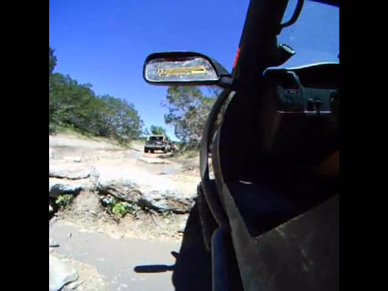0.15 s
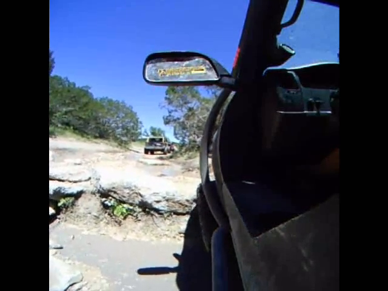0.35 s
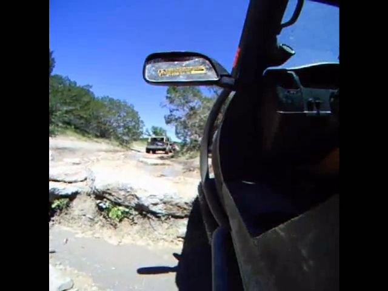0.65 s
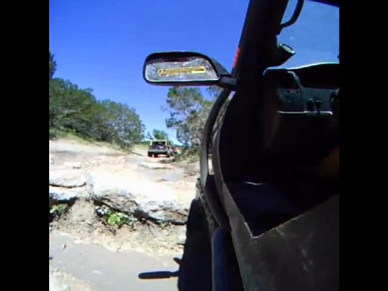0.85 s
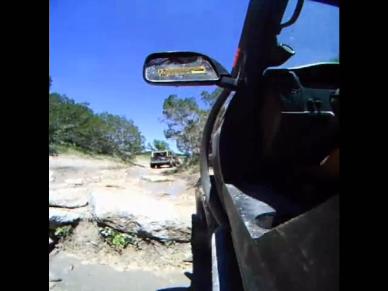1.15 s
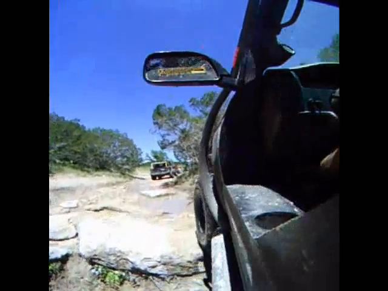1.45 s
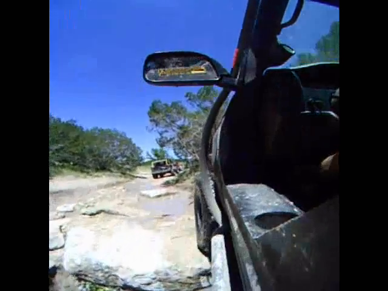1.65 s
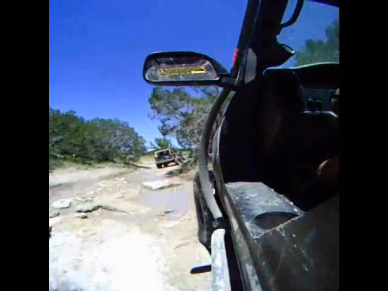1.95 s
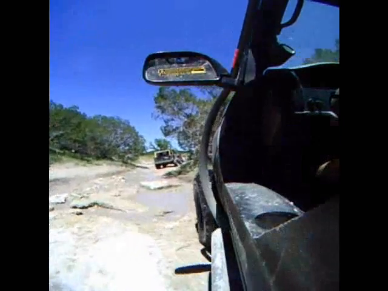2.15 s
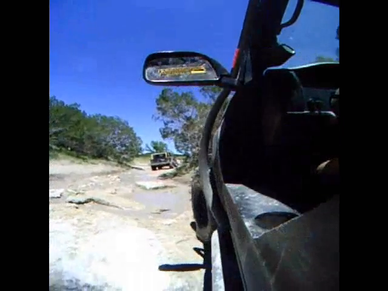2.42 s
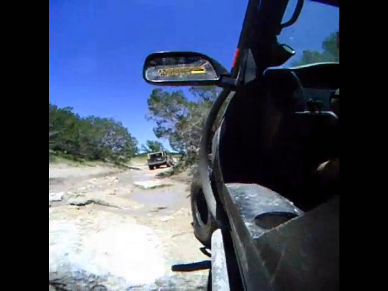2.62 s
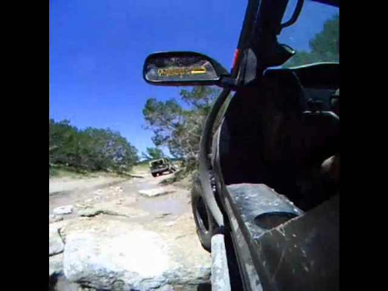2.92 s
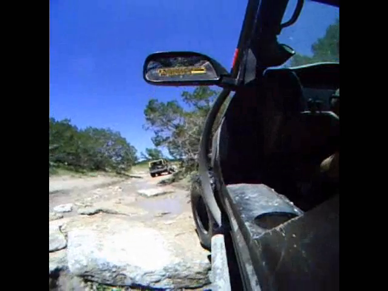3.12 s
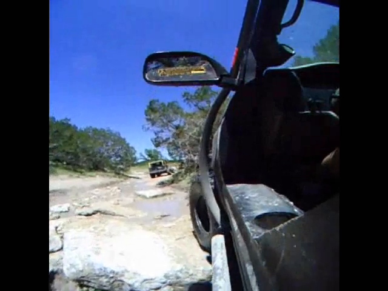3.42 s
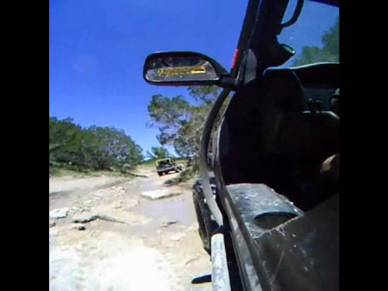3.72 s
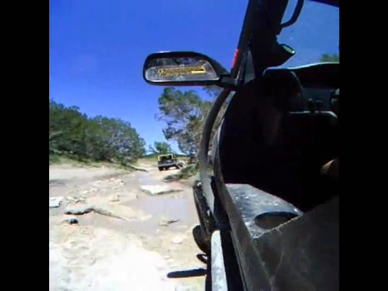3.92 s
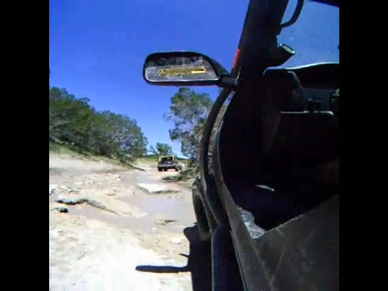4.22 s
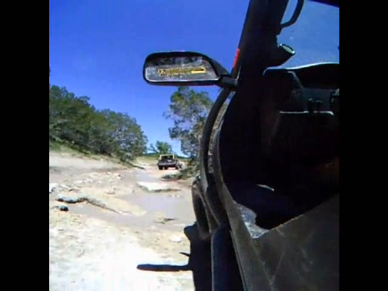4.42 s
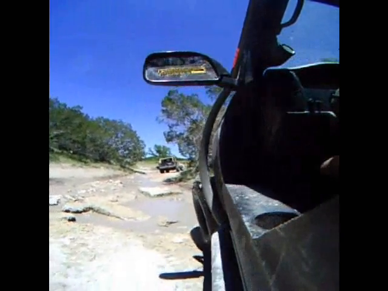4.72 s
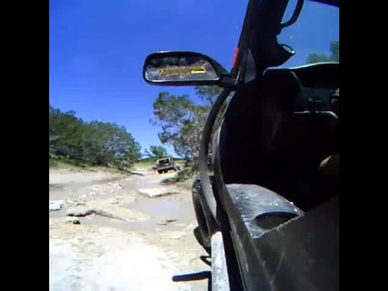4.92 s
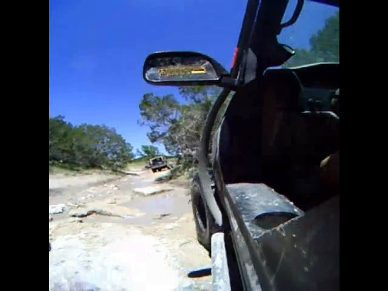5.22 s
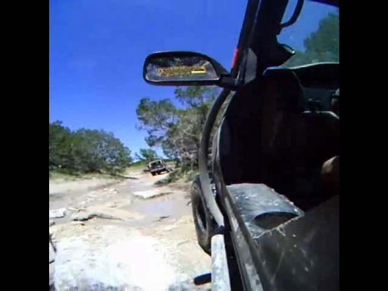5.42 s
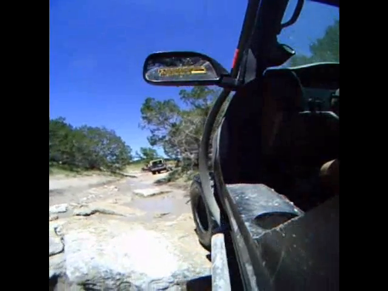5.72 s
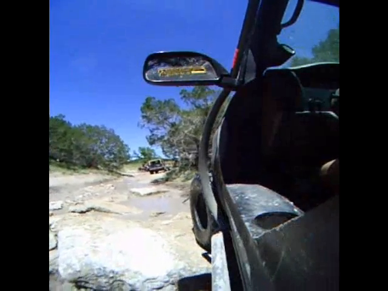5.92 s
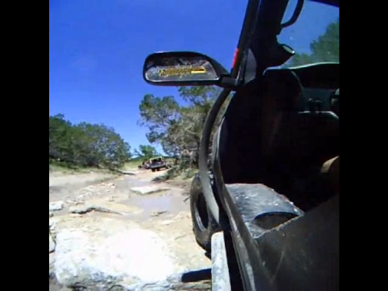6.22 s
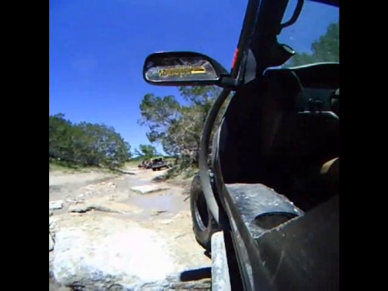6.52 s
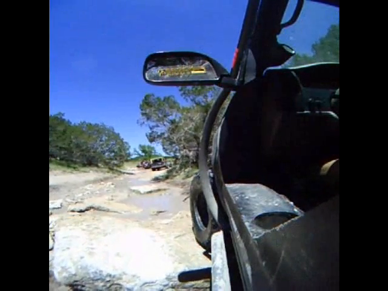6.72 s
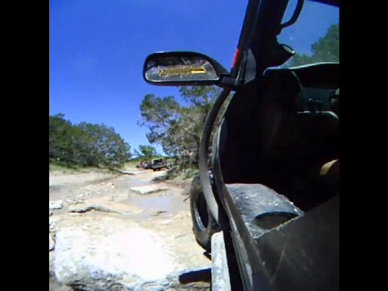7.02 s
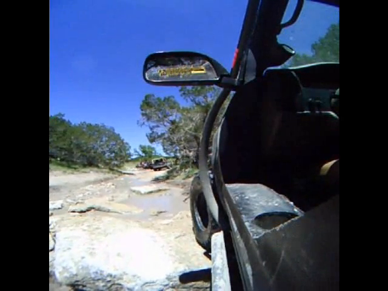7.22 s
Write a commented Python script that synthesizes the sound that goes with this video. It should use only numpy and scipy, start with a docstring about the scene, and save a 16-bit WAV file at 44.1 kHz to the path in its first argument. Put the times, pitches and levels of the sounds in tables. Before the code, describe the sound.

An off-road vehicle crawls over rock ledges, its engine swelling and cab booming low, with suspension knocks, metal clanks and rattles.

```python
"""Crawling over rock ledges

An off-road vehicle on rock, heard close up from a microphone on its door. The engine swells at each
step, the tyres thump and the shaken cab booms on one low note. The suspension knocks, the steel body
clanks and loose trim rattles. The small recorder adds hiss, and a fine crackle and thin whistle to the boom."""
import sys
import numpy as np
from scipy.fft import rfft, irfft, next_fast_len
from scipy.io import wavfile
from scipy.ndimage import map_coordinates

SR = 44100
rng = np.random.default_rng(int(sys.argv[2]) if len(sys.argv) > 2 else 0)


def generate_wav(signal):
    """Clip the signal to [-1, 1] and save it as 16-bit WAV at the path in sys.argv[1]."""
    frames = np.transpose(np.atleast_2d(signal))
    scaled = np.clip(frames, -1, 1) * 32767
    pcm = np.round(scaled).astype(np.int16)
    wavfile.write(sys.argv[1], SR, pcm)


N = 324344

# the driver feeds the throttle at each ledge: t/s, firing rate/Hz, engine bay level/dB
THROTTLE = [(0.0, 50.76, -65.5), (0.48, 59.79, -58), (1.2, 54.01, -61), (1.53, 51.01, -61),
            (1.85, 64.23, -55), (2.1, 52.7, -61.5), (2.45, 43.84, -71), (3.02, 66.54, -54.5),
            (3.33, 75.18, -48.5), (3.62, 73.14, -53), (3.87, 63.11, -45.5), (4.13, 52.02, -62),
            (4.42, 42.73, -66.5), (4.75, 47.41, -68), (5.18, 69.5, -59), (5.52, 76.01, -54.5),
            (6.3, 46.4, -64.5), (7.35, 35, -74)]
# modes of the steel body panels: f/Hz, width/Hz, level/dB
PANEL_MODES = [(764, 14, -8), (890, 40, -12), (1003, 20, -10), (1105, 45, -2), (1180, 25, -7),
               (1255, 60, 0), (1325, 28, -5), (1446, 25, -2), (1582, 30, -5), (1660, 20, -6),
               (1772, 38, -1), (1945, 36, -2), (2400, 70, -5), (2515, 80, -3), (2670, 80, -2),
               (2980, 50, -9), (3430, 50, -13), (5400, 130, -10), (5600, 100, -11), (6120, 50, -12),
               (6500, 50, -15), (6750, 80, -15), (9500, 100, -14), (9850, 50, -15), (10510, 140, -14)]
# modes of the suspension and frame: f/Hz, width/Hz, level/dB
FRAME_MODES = [(176, 12, -2), (223, 18, 2), (275, 28, -2), (408, 20, -3), (514, 30, -8), (764, 25, -11),
               (905, 50, -10), (1250, 60, -10), (1942, 70, -15)]
BOOM_HZ = 91.735  # the cab's low note, before it sags


def amp(db):
    """Decibels to gain."""
    return 10 ** (np.asarray(db) / 20)


def unit(x):
    """Scale to rms 1."""
    return x / np.sqrt(np.mean(np.abs(x) ** 2) + 1e-20)


def curves(rows):
    """One value per sample for each column after the time."""
    times, *columns = np.transpose(rows)
    return [np.interp(np.arange(N) / SR, times, column) for column in columns]


def wobble(rate):
    """A smooth random curve, rate knots a second."""
    return map_coordinates(rng.standard_normal(4096), [np.arange(N) * rate / SR], mode="wrap")


def turning(hz):
    """Running phase of a changing frequency."""
    return 2 * np.pi * np.cumsum(hz) / SR


def filtered(x, response):
    """Pass x through a complex response of frequency."""
    size = next_fast_len(N + SR // 2)
    return irfft(rfft(x, size) * response(np.fft.rfftfreq(size, 1 / SR)), size)[:N]


def coloured(x, points):
    """Shape x by points (f/Hz, level/dB); white noise keeps its power."""
    f, db = np.transpose(points)
    return filtered(x, lambda hz: unit(amp(np.interp(np.log(hz + 1), np.log(f), db))))


def resonated(x, modes):
    """Ring modes (f/Hz, width/Hz, level/dB) with x; white noise keeps its power."""
    def body(f):
        return unit(sum((-1) ** k * amp(db) * 1j * f * width / (hz * hz - f * f + 1j * f * width)
                        for k, (hz, width, db) in enumerate(modes)))
    return filtered(x, body)


def noise():
    """White noise of rms 1."""
    return rng.standard_normal(N)


def blows(rows, attack, t60):
    """Envelope of contacts (t/s, level/dB) that rise quickly and die away."""
    power, t = np.zeros(N + SR), np.arange(SR // 2) / SR
    for start, db in rows:
        power[round(start * SR):][:len(t)] += (amp(db - 60 * t / t60) * (1 - np.exp(-t / attack))) ** 2
    return np.sqrt(power[:N])


def engine(rough=0.628, throb=0.042, bay_db=-1.42, panel_db=-7.5, frame_db=-2.5, grit_db=1.34):
    """Firings drone in the exhaust and pulse the engine bay's noise; the belt pulleys whine along."""
    # the exhaust pipe drones most near one engine speed: firing rate/Hz, level/dB
    pipe_resonance = [(35, -90), (44, -58.5), (50, -49.5), (55, -42.5), (62, -42), (68, -46), (75, -48)]
    # exhaust partials: multiple of the firing rate, level/dB
    exhaust_orders = [(1, 0.5), (1.5, -10), (2, -42), (3, -26.5), (4, -28)]
    # engine bay noise as it reaches the door: f/Hz, level/dB
    bay_spectrum = [(76, -51), (130, -0.5), (236, -4.5), (541, -7.5), (709, -13.5), (1260, -12),
                    (1560, -24.5), (1930, -11), (2210, -27.5), (2530, -22.5), (4420, -32.5), (5460, -24),
                    (7430, -27.5), (8030, -28.5), (13000, -34.5)]
    # belt-driven accessories: multiple of the firing rate, level/dB
    pulley_orders = [(12, -16), (17, -13.5), (27, -21.5)]
    firing_hz, effort_db = curves(THROTTLE)
    exhaust_db = np.interp(firing_hz, *np.transpose(pipe_resonance))
    phase = turning(firing_hz * (1 + 0.01227 * wobble(12)))
    drone = sum(amp(db) * np.sqrt(2) * np.sin(k * phase) * (1 + rough * wobble(25))
                for k, db in exhaust_orders)
    pulsing = unit((1 + throb * np.cos(phase)) * amp(grit_db * wobble(70)))  # no two firings are alike
    bay = amp(bay_db) * coloured(noise() * pulsing, bay_spectrum)
    bay += amp(panel_db) * resonated(noise() * pulsing, PANEL_MODES)
    bay += amp(frame_db) * resonated(noise() * pulsing, FRAME_MODES)
    belt_phase = turning(firing_hz * (1 + 0.00311 * wobble(12)))  # the belt evens out the crank's jerks
    whine = sum(amp(db + 2.3 * wobble(20)) * np.sin(k * belt_phase) for k, db in pulley_orders)
    return amp(exhaust_db) * drone + amp(effort_db) * (bay + whine)


def shaking(linger_s=0.0201):
    """How hard the cab shakes as the wheels climb and drop: each jolt builds, lingers and dies away."""
    # jolts: peak t/s, level/dB, rise/s, fall by 20 dB/s (rows with a negative fall are silent)
    jolts = [(0.01, -29.5, 0.09, 0.05), (0.371, -34.5, 0.132, 0.31), (0.61, -34, 0.113, 0.4434),
             (0.801, -24, 0.073, 0.1235), (0.971, -35, 0.055, 0.11), (1.14, -35.5, .09, 0.01),
             (1.27, -31.5, 0.0683, 0.39), (1.5, -34, 0.133, 0.5959), (1.69, -25, 0.087, 0.2758),
             (1.876, -16.5, 0.015, 0.2012), (1.915, -14, 0.034, 0.2341), (2.01, -19.5, 0.12, 0.1157),
             (2.239, -41, 0.089, 0.4949), (2.83, -45.5, 0.24, -0.22), (3.09, -26.5, 0.1294, 0.1936),
             (3.44, -25, 0.113, 0.0773), (3.55, -17.5, 0.113, 0.0826), (3.715, -22.5, 0.03246, 0.1311),
             (3.805, -16, 0.0657, 0.1461), (4.0, -30.5, 0.144, 0.3332), (4.179, -30, 0.0595, 0.228),
             (4.4, -39.5, 0.146, 0.0154), (5.5, -27, 0.3567, .5), (5.96, -35, 0.049, -0.08),
             (6.11, -33.5, 0.1005, 0.09), (6.33, -42, 0.1481, 0.06), (6.54, -41.5, 0.0785, 0.12),
             (6.699, -43.5, 0.0807, 0.02), (7.2, -42, 0.516, 1.7331)]
    t = np.arange(N) / SR
    power = np.zeros(N)
    for peak, db, rise, fall in jolts:
        near = (t > peak - rise) & (t < peak + 3 * fall)
        age = t[near] - peak
        build = np.sin(np.pi / 2 * np.minimum(1 + age / rise, 1)) ** 2
        fading = np.hypot(np.maximum(age, 0), linger_s) - linger_s
        power[near] += (amp(db - 20 * fading / fall) * build) ** 2
    return np.sqrt(power)


def chassis(idle_db=-59, growth=0.693, jolt_db=-17.5, uneven_db=0.5, hum_hz=68, hum_db=-59):
    """The chassis rumbles more with effort and jolts, and the tyres thump, over a faint wavering hum."""
    # a tyre meets a rock step: t/s, level/dB
    tyre_thumps = [(0.36, -40), (0.56, -34.5), (0.74, -32.5), (1.26, -31), (1.82, -31), (3.43, -26),
                   (3.66, -26.5), (5.18, -37.5)]
    # rumble from under the vehicle: f/Hz, level/dB
    rumble_spectrum = [(10, -26.5), (25, 5.5), (45, 3), (70, 8), (120, -9), (250, -54)]
    effort_db = curves(THROTTLE)[1]
    rolling = amp(idle_db + growth * (effort_db - effort_db.min()) + uneven_db * wobble(6))
    thumping = blows(tyre_thumps, attack=0.0397, t60=1.21)
    level = np.linalg.norm([rolling, amp(jolt_db) * shaking(), thumping], axis=0)
    rumble = level * coloured(noise(), rumble_spectrum)
    hum_level = amp(hum_db + 3.534 * wobble(3.03))
    hum_phase = turning(hum_hz * (1 + 0.01843 * wobble(4.3)))
    return rumble + hum_level * np.sin(hum_phase)


def cab(rest_db=-52, waver_db=2.5, calm_db=-41, sag_hz=2, drift_hz=1.315, rough=0.27, buzz_db=-30):
    """The cab booms on one note that sags and roughens when shaken; its fittings buzz once a cycle."""
    # trembling fittings: f/Hz, level/dB
    buzz_spectrum = [(60, -48.5), (130, 3), (250, 4), (400, -12), (1000, -11.5), (4000, -17.5), (7000, -23),
                     (12000, -28)]
    level = np.hypot(shaking(), amp(rest_db + waver_db * wobble(9)))  # at rest it still hums
    unrest = level / (level + amp(calm_db))
    phase = turning(BOOM_HZ - sag_hz * np.sqrt(level / level.max()) + drift_hz * unrest * wobble(9))
    roughness = wobble(28) * np.sin(phase) + wobble(28) * np.cos(phase)
    boom = np.sqrt(2) * (np.sin(phase) + rough * unrest * roughness)
    boom = filtered(level * boom, lambda hz: 1 / (1 + (hz / 122) ** 20))  # even a sudden jolt stays deep
    buzz = coloured(noise() * (1 - .5 * np.sin(phase)), buzz_spectrum)
    return boom + amp(buzz_db) * level * buzz


def suspension_knocks(knock_db=-6.0, hollow_hz=408, hollow_db=-15):
    """The suspension takes each ledge with a dull knock; one hollow note outlasts it."""
    # knocks from below: t/s, level/dB
    hits = [(0.396, -37), (0.749, -50.5), (1.666, -37), (1.81, -39.5), (1.88, -34), (1.977, -41.5),
            (3.731, -29), (3.792, -31.5), (3.867, -29), (4.433, -38), (5.384, -38.5)]
    # modes of the springs and links: f/Hz, width/Hz, level/dB
    spring_modes = [(223.9, 18.3, -4.5), (289.3, 8.753, 1.5), (407.2, 7.2, 5.5), (533.2, 8.4, -5.5),
                    (665, 19, -13.5), (782.4, 11.9, -4), (925, 56, -11), (1009, 35, -16), (1237, 42, -11)]
    knock = resonated(noise() * blows(hits, attack=0.00205, t60=0.1684), spring_modes)
    hollow_phase = turning(hollow_hz * (1 + 0.00644 * wobble(40)))
    hollow = blows(hits, attack=0.0034, t60=0.203) * np.sin(hollow_phase)
    return amp(knock_db) * knock + amp(hollow_db) * hollow


def body_clanks(ring_db=-8.5, crash_db=-17.0, tail_db=-24, thud_db=-23):
    """Hard contacts ring the panels and thud through the frame; the cab carries a short tail."""
    # steel on steel: t/s, level/dB
    strikes = [(1.6368, -45.5), (1.6612, -36), (1.809, -42), (1.8265, -40.5), (2.4137, -46.5),
               (3.4925, -22), (3.694, -35), (3.7267, -11.5), (3.7928, -16.5), (3.8589, -12.5),
               (3.9074, -26.5), (5.3847, -41)]
    # every clank strikes, seats and rebounds: delay/s, level/dB
    contacts = [(0, 0), (.0045, -1.5), (0.022, -6.5)]
    # the broad crash of a contact: f/Hz, level/dB
    crash_spectrum = [(120, -33.5), (200, -21), (274, 2), (356, -8.5), (409, -15.5), (591, -8.5),
                      (1020, -10.5), (1250, 2.5), (2080, -14.5), (2560, 2.5), (3830, -20), (5520, -5.5),
                      (7430, -28), (10700, -13.5), (13000, -29.5)]
    hits = [(start + delay, db + loss_db) for start, db in strikes for delay, loss_db in contacts]
    ring = resonated(noise() * blows(hits, attack=0.00089, t60=0.0352), PANEL_MODES)
    crash = coloured(noise() * blows(hits, attack=0.000167, t60=0.0865), crash_spectrum)
    tail = resonated(noise() * blows(hits, attack=0.0034, t60=0.1869), PANEL_MODES)
    thud = resonated(noise() * blows(hits, attack=0.0115, t60=0.25), FRAME_MODES[:3])
    return amp(ring_db) * ring + amp(crash_db) * crash + amp(tail_db) * tail + amp(thud_db) * thud


def trim_rattles(tick_db=-1, tail_db=-26, slip=0.116, chatter_db=-10, scatter_db=0.5):
    """Loose trim chatters on the door, close to the microphone, about once per swing of the boom."""
    # bouts of chatter: t/s, first strike level/dB, length/s
    bouts = [(1.9042, -19.5, .04), (1.949, -25.5, .02), (1.9793, -22.5, .05), (2.396, -50.5, .01),
             (3.5465, -32, .02), (3.6584, -42, .01)]
    # modes of the trim: f/Hz, width/Hz, level/dB
    trim_modes = [(1164, 50, 4.5), (1990, 450.4, -1), (2670, 270, 1), (3419, 258, 5), (4280, 237, -1.5),
                  (4633, 316, 2), (5960, 1130, -18.5), (7520, 440, -13), (11870, 810, -8)]
    hits = []
    for start, db, length in bouts:
        hits.append((start, db))
        for k, (late, size) in enumerate(rng.standard_normal((16, 2)), 1):
            if k / BOOM_HZ < length:  # later strikes are weaker and uneven
                hits.append((start + (k + slip * late) / BOOM_HZ, db + chatter_db + scatter_db * size))
    ticks = amp(tick_db) * blows(hits, attack=0.000873, t60=0.00787)
    tails = amp(tail_db) * blows(hits, attack=0.00206, t60=0.167)
    return resonated(noise() * (ticks + tails), trim_modes)


def scene():
    """Everything that reaches the microphone on the door, in mono."""
    return (engine() + chassis() + cab() + body_clanks() + trim_rattles() + suspension_knocks())[None]


def record(dry, hiss_db=-63.5, crackle_db=-57, still_db=-89, flutter_hz=31.5, top_hz=12900):
    """The recorder hisses, crackles where the low wave stands still, and whistles in step with it."""
    # the recorder's crackle: f/Hz, level/dB
    crackle_spectrum = [(500, -32.5), (1500, -1), (3000, 5), (4000, -3), (5000, 1), (7000, -16),
                        (9000, -15), (11500, -5.5), (13000, -45.5)]
    # whistles that the boom modulates: f/Hz, level against the low wave/dB, flutter depth/rad
    whistle_tones = [(8015, -37.5, 1.1), (12107, -48.5, .3)]
    # the recorder's noise floor: f/Hz, level/dB
    hiss_spectrum = [(30, 12), (130, 13), (300, -3.5), (600, -5), (2500, -5), (4000, -10), (8000, -19),
                     (12500, -16.5)]
    mic, t = dry[0], np.arange(N) / SR
    low = filtered(mic, lambda hz: 1 / (1 + (hz / 400) ** 4))
    still = np.exp(-(np.gradient(low) / amp(still_db)) ** 2)
    catching = np.clip(1 + 2 * wobble(260), 0, 1)  # the crackle drops out now and then
    crackle = amp(crackle_db) * coloured(noise() * still * catching, crackle_spectrum)
    flutter = np.sin(2 * np.pi * flutter_hz * t)
    tones = sum(amp(db) * np.sin(2 * np.pi * hz * t + depth * flutter) for hz, db, depth in whistle_tones)
    whistle = low * np.sqrt(2) * tones
    hiss = amp(hiss_db) * coloured(noise(), hiss_spectrum)
    return filtered(mic + crackle + whistle + hiss, lambda hz: hz < top_hz)[None]


dry = scene()
out = record(dry)
generate_wav(out)
```